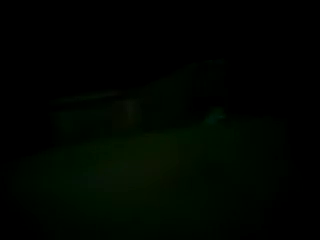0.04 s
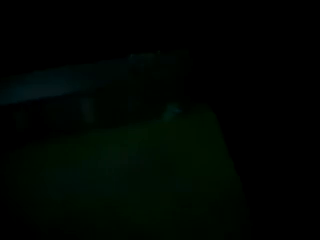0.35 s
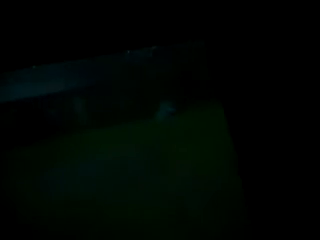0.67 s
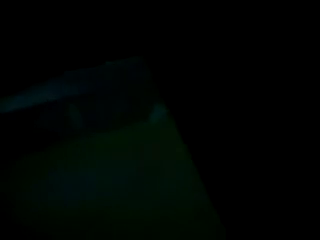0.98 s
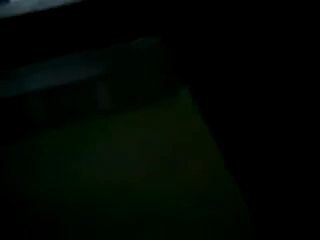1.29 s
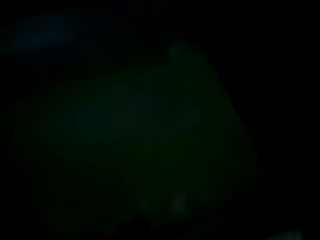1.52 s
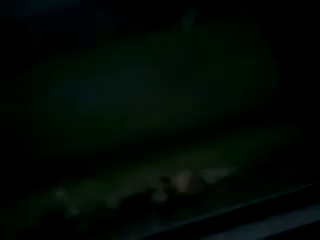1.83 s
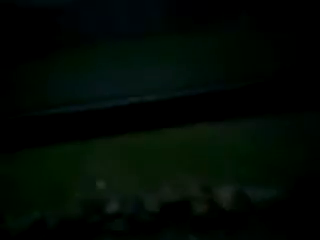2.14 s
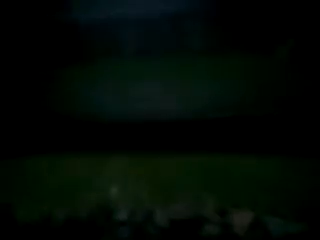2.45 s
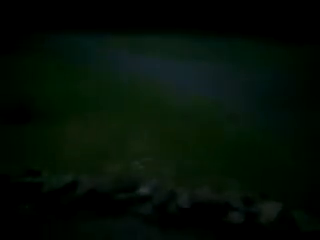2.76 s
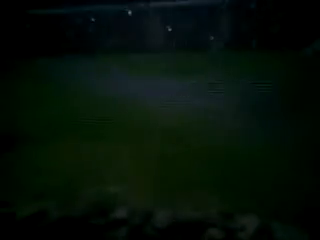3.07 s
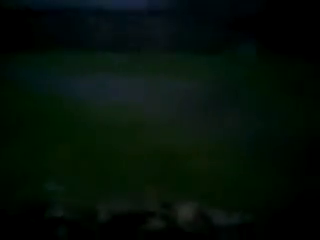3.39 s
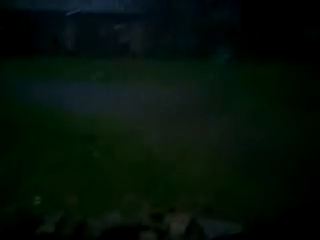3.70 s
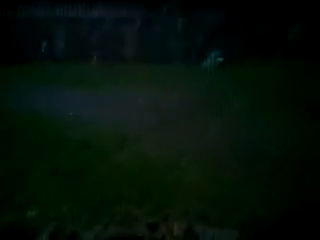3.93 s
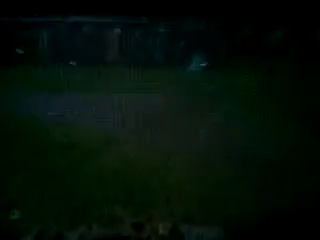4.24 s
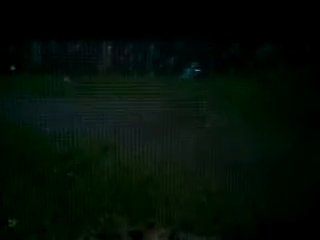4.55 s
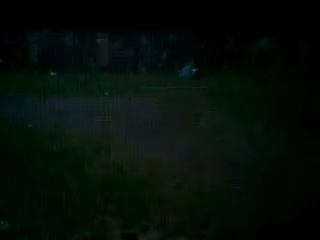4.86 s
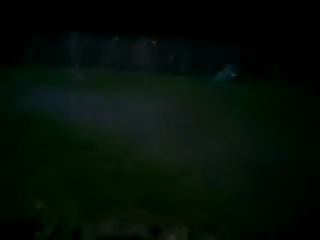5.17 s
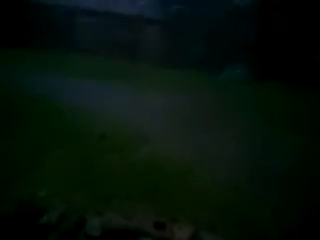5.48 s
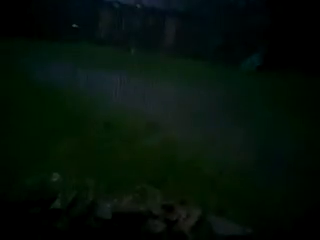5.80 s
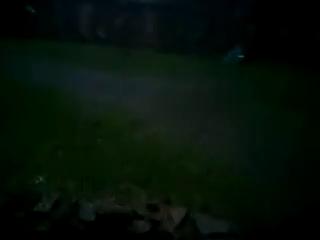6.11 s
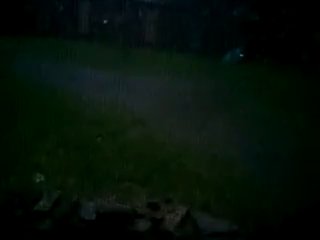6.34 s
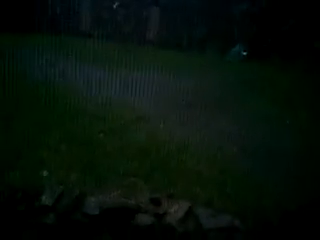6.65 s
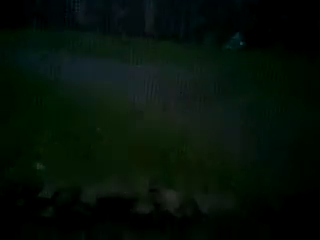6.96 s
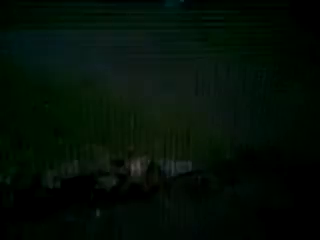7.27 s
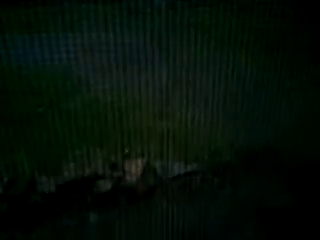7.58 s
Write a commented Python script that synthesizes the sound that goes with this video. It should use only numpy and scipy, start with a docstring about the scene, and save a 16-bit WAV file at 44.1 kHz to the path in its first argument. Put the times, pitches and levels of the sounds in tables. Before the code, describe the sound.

A hailstorm arrives over a lawn beside a forest, heard from a house through one small microphone. For the first second or so there is only a faint, distant hiss, with single stones knocking on wood, clacking and ticking, most with a short echo from the trees. From about 1.3 seconds the fall thickens quickly and stones ping close by. Something scrapes briefly near 1.7 seconds, and at 2.6 seconds comes one heavy, dull bump in the house. By 3 seconds countless impacts have merged into a steady, bright rush on the leaves, over a duller roar and a low drumming on roof and ground. This holds until the end, near 8 seconds. Sharp close hits cut through it, around 3.3, 4.5, 5.1, 6.8 and 7.7 seconds. They have a thin, high ring, and the hardest ones distort.

```python
"""A hailstorm reaches a lawn at the edge of a forest, heard from a house through one small microphone.
At first the storm is a far hiss, and single stones knock on wood, clack and tick. From 1.3 s
the fall thickens: stones ping close by, something scrapes, and at 2.6 s a heavy bump shakes the house.
By 3 s countless impacts merge into a steady rush on the leaves, over a duller roar and a drumming on
roof and ground. The microphone rings near 7 kHz, and the hardest hits clip."""
import sys
import numpy as np
from scipy import signal
from scipy.fft import rfft, irfft, next_fast_len
from scipy.io import wavfile
from scipy.ndimage import map_coordinates

SR = 44100
rng = np.random.default_rng(int(sys.argv[2]) if len(sys.argv) > 2 else 0)


def transcribe(u):
    """Save the signal u as a 16-bit wav file named by the first command-line argument.

    u: samples, shape (n,) or (channels, n), limited to [-1, 1]; the rate is SR.
    q: integer samples, one column per channel.
    """
    v = np.clip(np.atleast_2d(u).T, -1, 1)
    q = np.round(v * 32767).astype(np.int16)
    wavfile.write(sys.argv[1], SR, q)


N = 345303

# strength of the fall: t/s, patter level/dB, roar level/dB, drumming level/dB
FALL_LEVELS = [(1.3, -31.5, -33, -35), (1.6, -23.5, -35, -34), (1.85, -20.5, -27.5, -34.5),
               (2.3, -17.5, -26.5, -35), (2.52, -13.5, -22.5, -34), (3.05, -11, -19.5, -32),
               (3.7, -11, -21, -28.5), (4.3, -9.5, -22, -31.5), (5.8, -9.5, -21, -31.5),
               (7.1, -9.5, -21, -29), (7.83, -9.5, -20, -31)]
# spectrum of the storm's thin leading edge: f/Hz, relative level/dB
FRONT_SPECTRUM = [(1760, -48), (3000, -11), (3400, -8.5), (3850, -6), (6900, 4.5), (8260, -5.5), (9230, -6),
                  (10800, -10.5), (15100, -16.5), (15800, -16)]
# spectrum of stones on far crowns and grass: f/Hz, relative level/dB
ROAR_SPECTRUM = [(290, -33.5), (500, -11), (568, -16.5), (631, -8.5), (1340, -5), (1750, 0.4), (2150, -2),
                 (2900, -9.5), (3900, -32), (6600, -120)]


def amp(db):
    """Amplitude ratio of a level in decibels."""
    return 10 ** (np.asarray(db) / 20)


def unit(x):
    """Normalisation to rms 1."""
    return x / np.sqrt(np.mean(x ** 2) + 1e-20)


def along(points, hz):
    """Interpolation of (f/Hz, value) points on a logarithmic frequency axis."""
    f, values = np.transpose(points)
    return np.interp(np.log(hz + 1), np.log(f + 1), values)


def wobble(rate):
    """Random modulation: a spline through rate Gaussian knots a second."""
    return map_coordinates(rng.standard_normal(N // 100), [np.arange(N) * rate / SR], mode="wrap")


def coloured(x, spectrum):
    """Minimum-phase filtering by a (f/Hz, level/dB) spectrum; the result has rms 1."""
    m = 2 * next_fast_len(N // 2 + SR // 4)
    gain = amp(along(spectrum, np.fft.rfftfreq(m, 1 / SR)))
    cepstrum = irfft(np.log(gain + 1e-6))
    response = np.exp(rfft(2 * cepstrum[:m // 2], m))
    return unit(irfft(rfft(x, m) * response)[:N])


def resonance(x, hz, q):
    """Forced response of one damped mode, with gain 1 at its peak."""
    return signal.lfilter(*signal.iirpeak(min(hz, SR / 2 - 1), max(q, hz / SR * 4), SR), x)


def add(track, s, sound):
    """Superposition of a sound on the track at time s."""
    part = track[max(round(s * SR), 0):][:len(sound)]
    part += sound[:len(part)]


def impacts(per_second, spread_db):
    """Poisson impulses of log-normal size, at rms 1: near stones are louder than the rest."""
    size = amp(spread_db * np.minimum(rng.standard_normal(N), 2.5))
    return unit((rng.random(N) < per_second / SR) * size * rng.choice([-1, 1], N))


def below_full(s):
    """Patter level in dB at time s, relative to the full fall at -10 dB."""
    times, patter_db = np.transpose(FALL_LEVELS)[:2]
    return np.interp(s, times, patter_db) + 10


def distant_storm():
    """Far-off impacts sum incoherently to a faint Gaussian noise."""
    # spectrum of the far storm: f/Hz, relative level/dB
    spectrum = [(25, -6), (80, 2), (140, 6.5), (400, 0), (560, -6), (1150, -4.5), (1650, -0.5), (2400, -6),
                (2900, -15.5), (5800, -11.5), (6900, -1), (7900, -10), (10300, -14.5), (12000, -27.5)]
    return amp(-30.7 + 0.2 * wobble(8)) * coloured(rng.standard_normal(N), spectrum)


def knocks():
    """Damped vibration of struck wood: a broad thud and a rough ring; low pitches decay more slowly."""
    # blows on wood: t/s, relative level/dB, f/Hz
    blows = [(0.055, -28, 282), (0.56, -32, 900), (0.785, -23.5, 1750), (0.815, -26.5, 360),
             (0.924, -27, 2100), (0.955, -24.5, 398), (1.195, -27.5, 380), (1.551, -27, 256),
             (2.176, -17, 1470), (3.25, -10.5, 1700), (6.25, -15, 1900)]
    out, t = np.zeros(N), np.arange(SR // 4) / SR
    for s, db, hz in blows:
        t60 = 0.071 * (hz / 1000) ** -0.32
        thud = unit(resonance(rng.standard_normal(len(t)), hz, q=.7))
        ring = unit(resonance(thud, hz, q=1.5))
        envelope = amp(db + 2 - 60 * t / t60) * (1 - np.exp(-t / 0.0018))
        add(out, s, envelope * unit(ring + amp(-3) * thud))
    return out


def stone(db, hz, t60, echo_db, q, skirt, dull_hz, port, ping):
    """Impact excitation: a crack and a ping at one pitch ring the microphone port and echo in the trees."""
    t = np.arange(SR // 8) / SR
    decay = amp(-60 * t / max(t60, .002))
    burst = rng.standard_normal(len(t)) * decay
    crack = resonance(burst, hz, q) + skirt * burst + ping * decay * np.sin(2 * np.pi * hz * t)
    # the microphone lifts 7 kHz and hollows out 3 kHz
    crack = crack + port * resonance(crack, hz=6950, q=7) - .75 * resonance(crack, hz=2950, q=2.5)
    # ice is soft enough to leave out the highest treble
    crack = signal.sosfilt(signal.butter(3, dull_hz, fs=SR, output="sos"), crack)
    crack = crack * amp(db) / np.abs(crack).max()
    heard = amp(echo_db) * forest(crack)
    add(heard, 0, crack)
    return heard


def forest(x):
    """Reverberation: trunks scatter sound into a tail that lasts longest near 4 kHz."""
    # reverberation time of the forest: f/Hz, T60/s
    decay_times = [(300, 0.11), (4000, 0.3), (8000, 0.16), (15000, 0.047)]
    hz, t, noise = signal.stft(rng.standard_normal(SR // 3), SR, nperseg=256)
    decay = amp(-60 * t / along(decay_times, hz)[:, None])
    tail = signal.istft(noise * decay, SR, nperseg=256)[1]
    return signal.fftconvolve(x, tail / np.linalg.norm(tail))


def clacking_stones():
    """Heavily damped resonance: single hailstones, far or near, clack and tick, most with an echo."""
    # single hits: t/s, peak level/dB, f/Hz, relative echo level/dB
    hits = [(0.057, -21, 6900, -1), (0.238, -12.5, 6800, 1), (0.266, -17.5, 4800, -2),
            (0.423, -12, 9600, -13), (0.56, -19, 5600, -22), (0.784, -13, 4300, -2), (0.812, -17, 4500, -1),
            (0.988, -14.5, 6560, -7), (1.03, -21.5, 6500, 7), (1.19, -18.5, 4940, -11),
            (2.175, -7, 6000, 2), (3.256, 1, 4800, -3), (5.74, -1, 6900, -1)]
    out = np.zeros(N)
    for s, db, hz, echo_db in hits:
        clack = stone(db, hz, t60=0.043, echo_db=echo_db, q=2.6, skirt=.04, dull_hz=9400, port=.19, ping=0)
        add(out, s, clack)
    return out


def close_stones():
    """Direct sound dominates near by: short pings that ring longer as the stones grow with the fall."""
    # the loudest close hits: t/s, peak level/dB, f/Hz
    hits = [(1.583, -5.5, 9300), (1.7527, 0, 5750), (1.805, -7, 9400), (1.9445, -3, 5200),
            (1.9708, -2, 6400), (2.167, 5, 6940), (2.3308, 0, 6840), (2.347, 4, 7060), (2.3536, 1, 7130),
            (2.407, -2, 6800), (2.4685, 3, 7460), (2.5216, 1, 6670), (2.566, 6, 6840), (3.2293, 4, 6800),
            (3.407, 4, 7300), (4.3806, 6, 6640), (4.488, 10, 6930), (4.79, 5, 7860), (5.145, 13, 7300),
            (5.9748, 5, 6900), (6.829, 10, 6470), (7.6912, 12, 7160)]
    out = np.zeros(N)
    for s, db, hz in hits:
        t60 = 0.011 * amp(0.7 * below_full(s))
        add(out, s, stone(db, hz, t60, echo_db=-8.5, q=3.3, skirt=.085, dull_hz=10200, port=.45, ping=.67))
    return out


def strays():
    """Scattering smears random hits on branches, each a crack and a woody knock, louder as the fall grows."""
    t = np.arange(SR // 8) / SR
    clack = rng.standard_normal(len(t)) * amp(-60 * t / 0.043)
    hits = signal.fftconvolve(impacts(per_second=22, spread_db=0.5), clack)[:N]
    hits = hits + amp(-3) * forest(hits)[:N]
    crack = coloured(resonance(hits, hz=3870, q=1.8), FRONT_SPECTRUM)
    wood = amp(-5) * coloured(hits, ROAR_SPECTRUM)
    level_db = -24.5 + 0.77 * below_full(np.arange(N) / SR)
    return amp(level_db) * (crack + wood)


def ticks(count, centre_hz, scatter, cycles, spread_db):
    """Free decay: each of count stones is a brief damped sinusoid of its own pitch and size."""
    when, pitch, life, size = rng.random((count, 4)).T[:, :, None]
    hz = centre_hz * np.exp(scatter * (2 * pitch - 1))
    t = np.arange(SR // 150) / SR
    strength = amp(-spread_db * np.log(np.maximum(size, .02)))
    decay = np.exp(-t * hz / (cycles * (.5 + life)))
    rings = strength * np.sin(2 * np.pi * hz * t) * decay
    index = (when * N).astype(int) + np.arange(len(t))
    return unit(np.bincount(index.ravel(), rings.ravel(), N)[:N])


def roar(level_db):
    """The bulk of the fall, on far crowns and lawn, sums incoherently to noise with dull taps in it."""
    taps = ticks(count=2500, centre_hz=1716, scatter=0.57, cycles=1.6, spread_db=2.8)
    swell_db = 0.79 * wobble(12) + .6 * wobble(30)
    wash = amp(-0.23) * coloured(rng.standard_normal(N), ROAR_SPECTRUM)
    return amp(level_db + swell_db) * (wash + amp(-11.5) * coloured(taps, ROAR_SPECTRUM))


def drumming(level_db):
    """Low-frequency shot noise: dense soft thuds on roof and ground."""
    # response of roof and ground: f/Hz, relative level/dB
    spectrum = [(12, -43), (20, -7.5), (70, -13.5), (145, 1), (218, 0), (275, -0.5), (328, -0.5),
                (562, -8.5), (650, -12), (840, -15.5), (1430, -120)]
    return amp(level_db + 0.59 * wobble(6.5)) * coloured(impacts(per_second=1500, spread_db=3), spectrum)


def patter(level_db):
    """Shot noise on leaves: small hits blend to a hiss, and nearer stones tick and ping out of it."""
    # spectrum of the full fall on leaves: f/Hz, relative level/dB
    spectrum = [(1410, -36.5), (2400, -20.5), (2950, -16), (3880, -5.5), (4800, -7), (7060, 2.5),
                (9900, -16.5), (12800, -20.5), (15100, -22), (15800, -18.5)]
    small = impacts(per_second=12000, spread_db=3)
    near = ticks(count=1500, centre_hz=8250, scatter=0.58, cycles=1.8, spread_db=1.5)
    full = amp(-0.75) * coloured(small, spectrum) + amp(-11) * coloured(near, spectrum)
    full += amp(-9) * pings(per_second=70, ring_s=0.003)
    front = amp(0.1) * coloured(impacts(per_second=6500, spread_db=0), FRONT_SPECTRUM)
    flurry_db = .35 * wobble(8) + .55 * wobble(35)
    # equal-power crossfade from the thin front to the full fall
    thin = np.clip((level_db.max() - level_db) / 9, 0, 1)
    return amp(level_db + flurry_db) * (np.sqrt(1 - thin) * full + np.sqrt(thin) * front)


def scrape():
    """Stick-slip friction: something rubs briefly, and its dense slips drive two resonances."""
    # resonances of the rubbed body: f/Hz, level/dB, Q
    modes = [(350, -32, 1.1), (950, -29.5, 3.9)]
    corners = 1.64 + np.cumsum([0, 0.071, 0.056, 0.042])  # onset, then rise, hold and fall, in s
    stroke = np.interp(np.arange(N) / SR, corners, [0, 1, 1, 0])
    slips = impacts(per_second=2000, spread_db=2)
    return stroke * sum(amp(db) * unit(resonance(resonance(slips, hz, q), hz, q)) for hz, db, q in modes)


def pings(per_second, ring_s):
    """Port resonance: hard stones ring the microphone with brief, uneven bursts of noise."""
    t = np.arange(SR // 40) / SR
    hits = (rng.random(N) < per_second / SR) * rng.uniform(0.62, 1, N) ** 2
    energy = np.abs(signal.fftconvolve(hits, np.exp(-2 * t / ring_s))[:N])
    return unit(resonance(np.sqrt(energy) * rng.standard_normal(N), hz=6750, q=6.9))


def thump():
    """Modal vibration: one heavy, soft blow on the house excites a few low, well damped modes."""
    # modes of the house: f/Hz, relative level/dB, T60/s
    modes = [(75, -30, 0.14), (111, -11, 0.076), (145, -12, 0.09), (198, -12.5, 0.079), (264, -18, 0.082)]
    out, t = np.zeros(N), np.arange(SR // 4) / SR
    ring = sum(amp(db - 60 * t / t60) * np.sin(2 * np.pi * hz * t) for hz, db, t60 in modes)
    add(out, s=2.603, sound=1.5 * ring * (1 - np.exp(-t / 0.0039)))
    return out


def scene():
    """Superposition: all sources meet at one microphone, the same in both channels."""
    t = np.arange(N) / SR
    times, *levels = np.transpose(FALL_LEVELS)
    patter_db, roar_db, drum_db = (np.interp(t, times, level) for level in levels)
    # the front reaches the leaves quickly and the ground more gradually
    on_leaves = np.interp(t, [1.27, 1.46], [.13, 1])
    on_ground = np.interp(t, [.7, 1.4, 1.8], [.2, .65, 1])
    distant = distant_storm()
    fall = on_leaves * patter(patter_db) + on_ground * (roar(roar_db) + drumming(drum_db))
    mono = distant + fall + strays() + clacking_stones() + close_stones() + knocks() + scrape() + thump()
    return np.array([mono, mono])


def record(dry):
    """Hard clipping near full scale, followed by the recorder's band limit."""
    top_hz = 15900
    clipped = np.clip(dry, -.98, .98)
    m = next_fast_len(N + SR // 4)
    passband = np.fft.rfftfreq(m, 1 / SR) < top_hz
    return irfft(rfft(clipped, m) * passband, m)[:, :N]


dry = scene()
out = record(dry)
transcribe(out)
```